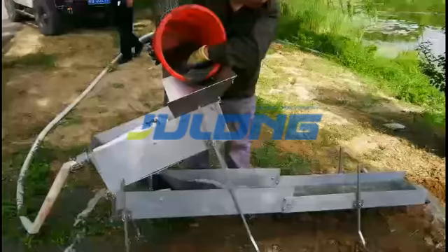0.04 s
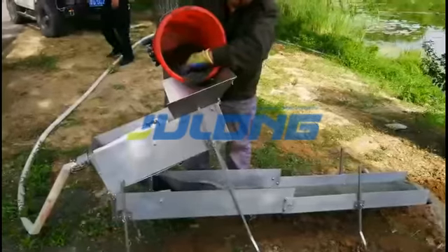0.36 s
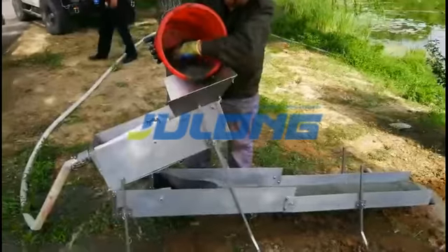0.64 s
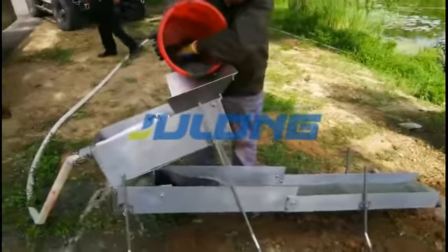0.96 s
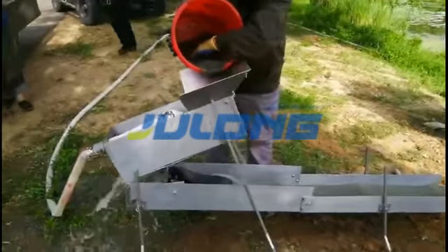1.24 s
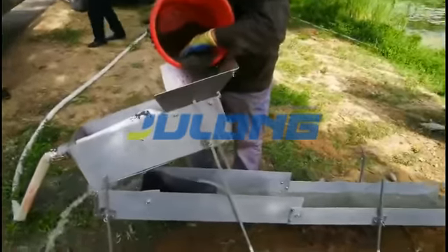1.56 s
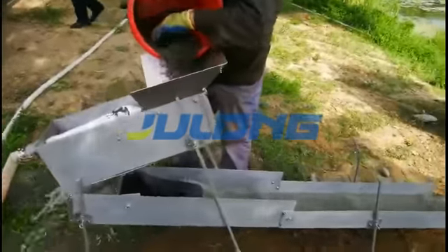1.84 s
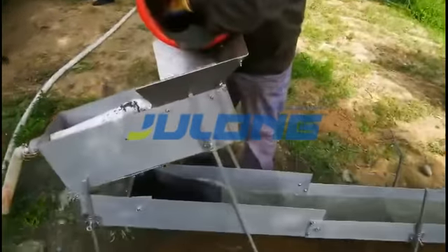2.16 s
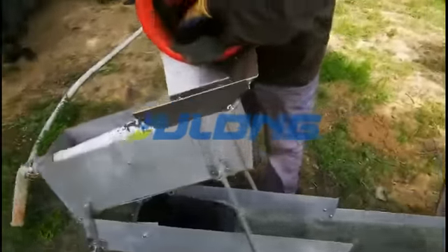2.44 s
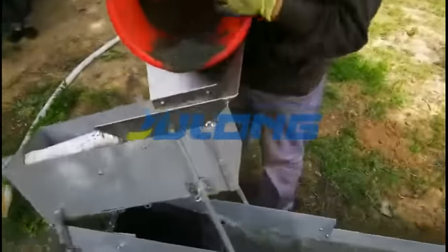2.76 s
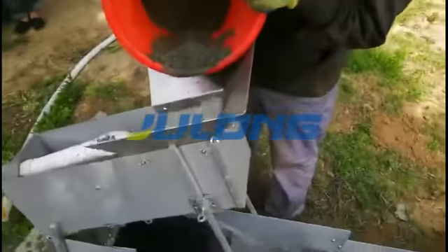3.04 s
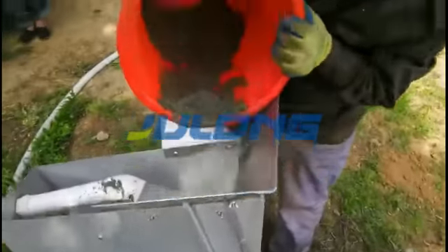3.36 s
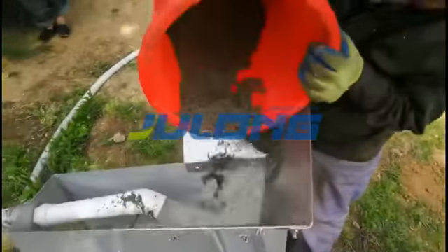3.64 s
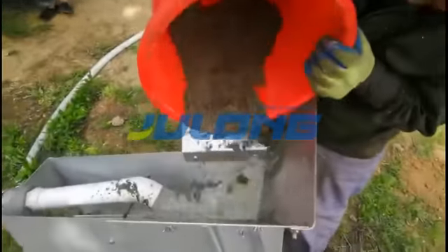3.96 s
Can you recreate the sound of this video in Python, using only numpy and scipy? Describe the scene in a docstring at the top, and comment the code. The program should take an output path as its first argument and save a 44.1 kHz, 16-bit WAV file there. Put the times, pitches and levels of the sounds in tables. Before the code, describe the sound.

Water sprays, spatters and gurgles through a metal sluice box outdoors, with a pump engine thudding a little way off. The hiss brightens as the microphone moves closer, and near the end wet sand and stones drop into the hopper.

```python
"""Outdoors at a sheet-metal sluice box, fed by a single-cylinder pump engine thudding a little way off.
Water jets hiss and spatter on the metal, droplets ping, bubbles gurgle and plop down the trough.
The sound fades in, then brightens as the listener steps closer. Light wind rumbles; grit ticks on
the metal. Near the end, lumps of wet sand drop from a bucket and ring the hopper."""
import sys
import numpy as np
from scipy import signal
from scipy.fft import rfft, irfft
from scipy.io import wavfile
from scipy.ndimage import map_coordinates

SR = 44100
rng = np.random.default_rng(int(sys.argv[2]) if len(sys.argv) > 2 else 0)


def persist_wave(psi):
    """Save psi, clipped to +-1, as 16-bit WAV."""
    counts = np.round(np.clip(psi, -1, 1) * 32767).astype(np.int16)
    wavfile.write(sys.argv[1], SR, np.atleast_2d(counts).T)


N = 176400

# firing rate, hunting round the governor: time_s, rate_hz
FIRING_RATE = [(0.0, 27.214), (0.45, 27.204), (0.7, 27.42), (0.95, 27.05), (1.33, 27.645), (1.62, 27.083),
               (1.8, 26.791), (2.15, 27.32), (2.9, 27.273), (3.5, 27.43), (3.78, 26.75), (4.0, 27.485)]
# exhaust thud partials: firing_multiple, level_db
EXHAUST_PARTIALS = [(1, -22), (2, -12), (3, -12), (4, -18), (5, -2), (6, -2), (7, -6), (8, -9), (9, 0),
                    (10, -7), (11, -.5), (12, -4), (13, -3), (14, -8), (15, -5), (16, -8), (17, -17),
                    (18, -8), (19, -17)]
# thud rebounds in the exhaust and off the surroundings: delay_s, gain
EXHAUST_REBOUNDS = [(.0133, .27), (.0169, .3), (.0206, .2), (.0245, .36)]
# swell of the booming partial: time_s, gain_db
BOOM_GAIN = [(.4, 1.5), (1.1, -0.5), (1.5, -1.5), (1.9, 4), (2.7, 3), (3.1, 0.5), (4, -16)]
# engine clatter: freq_hz, partial_db
CLATTER_SPECTRUM = [(545, -79), (620, -68), (682, -54.5), (725, -69), (815, -55), (960, -66), (1080, -57.5),
                    (1200, -82), (1600, -67.5)]
# water churning in the box: freq_hz, density_db
CHURN_SPECTRUM = [(60, -103), (180, -71), (240, -67), (560, -75.5), (680, -74.5), (820, -72), (950, -73),
                  (1090, -77), (1350, -76.5), (1900, -90), (4000, -105)]
# jet hiss: freq_hz, density_db
HISS_SPECTRUM = [(500, -73.5), (1300, -79), (1900, -79.5), (2800, -76), (7000, -77.5), (8300, -76),
                 (9700, -77), (15000, -76.5)]
# swell of hiss and droplets: time_s, gain_db
JET_GAIN = [(.3, -6), (.8, -4.5), (1.24, -4), (1.35, 0), (1.41, -3), (1.6, -2), (2.05, -1), (3.3, -0.7),
            (3.62, 0), (3.72, 3), (3.84, 2), (3.92, 4), (4, 3.5)]
# fine spatter on metal: freq_hz, density_db
SPATTER_SPECTRUM = [(7500, -101.5), (10000, -81), (11300, -72), (12700, -66.5), (14000, -69),
                    (15500, -78.5)]
# swell of the spatter: time_s, gain_db
SPATTER_GAIN = [(.3, -7.5), (.7, -6), (1.22, -4.5), (1.35, 0.5), (1.4, -7.5), (1.56, -2), (1.75, -3.5),
                (2.02, 1), (2.18, -3.5), (2.33, -0.5), (2.9, -5), (3.15, -2), (3.55, -1.5), (3.82, 0),
                (3.95, 1)]
# wind rumble: freq_hz, density_db
WIND_SPECTRUM = [(20, -87), (60, -71.5), (115, -74), (600, -100)]
# gusts: time_s, gain_db
WIND_GAIN = [(.3, -2), (.48, 11.5), (.65, -1), (1.05, 14), (1.5, 4), (1.7, 0), (3.1, 3), (4, -7)]
# grit hits: start_s, level_db
GRIT_TICKS = [(0.395, -29), (1.477, -24.5), (1.5415, -26), (2.0005, -22.5), (2.3192, -26), (3.0887, -26),
              (3.44, -25), (3.6705, -27), (3.693, -19.5)]
# ring of a tick: freq_hz, relative_db
TICK_SPECTRUM = [(2000, -56), (7000, 7), (8500, 8), (9700, 6.5), (11300, 12), (13500, 20), (15500, -18)]
# large air pockets: start_s, level_db, pitch_hz, glide_hz_per_s, attack_s
AIR_POCKETS = [(1.829, -31, 915, 4200, .005), (3.587, -28, 810, 5000, .008), (3.783, -31, 630, 4500, .012),
               (3.801, -28, 775, 1800, .009), (3.796, -30.5, 1410, -2000, .009)]
# wet sand landing: start_s, level_db, attack_s
SAND_LUMPS = [(3.329, -37, 0.011), (3.577, -37.5, 0.014), (3.789, -47, 0.012), (3.897, -38, .037)]
# hopper resonances: freq_hz, width_hz, relative_db
HOPPER_MODES = [(550, 240, 1), (816, 170, -2), (1410, 140, -2), (1646, 180, 2.5)]
# stones hitting the hopper: start_s, level_db
STONE_KNOCKS = [(3.3235, -22), (3.334, -28), (3.578, -32)]
# ring of a knock: freq_hz, relative_db
KNOCK_PARTIALS = [(212, -2), (305, -1), (700, -8), (985, -9), (1104, -11), (1480, -9)]
# left-right likeness: freq_hz, coherence
STEREO_COHERENCE = [(50, 0.3), (130, 0), (240, 1), (400, 0.27), (700, 0.16), (2600, 0.07), (15000, 0.07)]

LEFT_LAG_S = 0.000368
EAR_LAG_S = np.array([[LEFT_LAG_S], [0]])


def from_db(db):
    """Decibels to gain."""
    return 10 ** (np.asarray(db) / 20)


def unit_rms(x):
    """Scale to rms 1."""
    return x / np.sqrt(np.mean(x ** 2) + 1e-20)


def seconds():
    """Time of every sample."""
    return np.arange(N) / SR


def in_time(rows):
    """Table read linearly over time."""
    return np.interp(seconds(), *np.transpose(rows))


def at_hz(rows, hz):
    """Table read on a log-frequency axis."""
    freq_hz, value = np.transpose(rows)
    return np.interp(np.log(np.maximum(hz, 1)), np.log(freq_hz), value)


def stereo_noise():
    """Two independent white noises."""
    return rng.standard_normal((2, N))


def colour(x, spectrum):
    """Shape unit-rms white noise to a spectral density."""
    gain = from_db(at_hz(spectrum, np.fft.rfftfreq(N, 1 / SR))) * np.sqrt(SR / 2)
    return irfft(rfft(x) * gain, N)


def drift(rate_hz, hop=40):
    """Slow random wander, rms 1."""
    pole = np.exp(-2 * np.pi * rate_hz * hop / SR)
    slow = signal.lfilter([1], [1, -2 * pole, pole * pole], rng.standard_normal(N // hop + 2002))[2000:]
    return np.interp(np.arange(N) / hop, np.arange(len(slow)), unit_rms(slow))


def resonate(x, hz, width_hz):
    """Two-pole resonance, peak gain 1."""
    r = np.exp(-np.pi * width_hz / SR)
    feedback = [1, -2 * r * np.cos(2 * np.pi * hz / SR), r * r]
    return signal.lfilter(np.array([1, 0, -1]) * (1 - r * r) / 2, feedback, x + 1e-18)


def spread(pair):
    """Mix two independent signals to partly coherent stereo, left lagging."""
    hz = np.fft.rfftfreq(N, 1 / SR)
    coherence = np.clip(at_hz(STEREO_COHERENCE, hz), 0, .98)
    mid, side = rfft(pair) * np.sqrt([(1 + coherence) / 2, (1 - coherence) / 2])
    return irfft([(mid + side) * np.exp(-2j * np.pi * hz * LEFT_LAG_S), mid - side], N)


def pan(left_db):
    """Channel gains for a left-minus-right level."""
    return from_db([[left_db / 2], [-left_db / 2]])


def impacts(per_s, size_db):
    """Random impulses, many small, few large."""
    return (rng.random(N) < per_s / SR) * from_db(size_db * np.minimum(rng.exponential(1, N), 4))


def burst(start_s, attack_s, decay_s):
    """Linear rise, exponential fall."""
    age_s = seconds() - start_s
    return np.clip(age_s / attack_s, 0, 1) * np.exp(-np.maximum(age_s - attack_s, 0) / decay_s)


def splash_envelope(per_s, size_db, decay_s):
    """Random decaying splashes summed in power, rms 1."""
    power = signal.lfilter([1], [1, -np.exp(-2 / (decay_s * SR))], impacts(per_s, size_db) ** 2 + 1e-18)
    return unit_rms(np.sqrt(power))


def exhaust(angle_rad, mean_hz, level_db=-44, boom_multiple=9):
    """Each firing thuds: harmonics of the firing rate, phase-smeared by rebounds."""
    out = 0
    for k, partial_db in EXHAUST_PARTIALS:
        rebounds = sum(gain * np.exp(-2j * np.pi * k * mean_hz * s) for s, gain in EXHAUST_REBOUNDS)
        phase_rad = np.angle(1 + rebounds) + rng.normal(0, .1, (2, 1))
        boom_db = in_time(BOOM_GAIN) if k == boom_multiple else 0
        brighten_db = 0.095 * k * (seconds() - 2)
        waver_db = 1.04 * drift(rate_hz=1.7)
        gain = from_db(level_db + partial_db + boom_db + brighten_db + waver_db)
        out += gain * np.cos(k * angle_rad + phase_rad)
    return np.sqrt(2) * out


def clatter(angle_rad, mean_hz, waver_db=3.0):
    """Engine rattle repeats every cycle: upper harmonics at random phases."""
    out = 0
    for k in range(len(EXHAUST_PARTIALS) + 1, 58):
        gain = from_db(at_hz(CLATTER_SPECTRUM, k * mean_hz) + waver_db * drift(rate_hz=3.9))
        out += gain * np.cos(k * angle_rad + rng.uniform(0, 2 * np.pi, (2, 1)))
    return np.sqrt(2) * out


def puff(since_firing_s, centre_hz=308, width_hz=250, decay_s=0.01, level_db=-44.5, rise_db_per_s=2.5):
    """A rough puff of gas follows each firing."""
    gas = np.exp(-since_firing_s / decay_s) * rng.standard_normal(N)
    band = resonate(resonate(gas, centre_hz, width_hz), centre_hz, width_hz)
    return unit_rms(band) * from_db(level_db + rise_db_per_s * (seconds() - 2.5))


def engine(first_firing_cycles=.291):
    """One cylinder: thud, clatter and puff locked to the firing cycle."""
    mean_hz = np.mean(np.array(FIRING_RATE)[:, 1])
    cycles = np.cumsum(in_time(FIRING_RATE)) / SR - first_firing_cycles - mean_hz * EAR_LAG_S
    angle_rad = 2 * np.pi * cycles
    return exhaust(angle_rad, mean_hz) + clatter(angle_rad, mean_hz) + puff(cycles[1] % 1 / mean_hz)


def churn(surge_db=0.35, rise_db_per_s=0.8):
    """Water churns in the trough: dense overlapping splashes."""
    slosh = splash_envelope(per_s=780, size_db=2.0, decay_s=0.0079)
    slosh *= from_db(surge_db * drift(rate_hz=5.7))
    water = colour(unit_rms(slosh * stereo_noise()), CHURN_SPECTRUM)
    return spread(water * from_db(rise_db_per_s * (seconds() - 2)))


def bubbles(per_s=240, q=10.5, bands=16, level_db=-50, fall_db_per_s=2.5):
    """Bubbles ring briefly in the trough: a gurgle."""
    ring = 0
    for hz in np.geomspace(620, 1150, bands):
        births = impacts(per_s / bands, size_db=2.5) * stereo_noise()
        ring += resonate(births, hz, hz / q) / hz
    return spread(unit_rms(ring) * from_db(level_db - fall_db_per_s * (seconds() - 2)))


def splashes(per_s, size_db, decay_s, wash):
    """Stereo noise of sharp splashes over an even wash, rms 1."""
    envelope = np.hypot(splash_envelope(per_s, size_db, decay_s), wash)
    return unit_rms(envelope * stereo_noise())


def shimmer(x, depth_db=2.3, patch_hz=330, patch_s=.045):
    """Narrow patches of the spectrum flicker independently, alike in both ears."""
    hz, time_s, cells = signal.stft(x, SR, nperseg=512)
    grid = np.array(np.meshgrid(hz / patch_hz, time_s / patch_s, indexing="ij"))
    flicker_db = depth_db * map_coordinates(rng.standard_normal(cells[0].shape), grid)
    return signal.istft(cells * unit_rms(from_db(flicker_db)), SR)[1][:, :N]


def spray():
    """Jets break into drops: coarse hiss, plus fine spatter on the metal."""
    hiss = colour(splashes(per_s=440, size_db=1.0, decay_s=0.02, wash=0.44), HISS_SPECTRUM)
    spatter = colour(splashes(per_s=230, size_db=-0.5, decay_s=0.011, wash=0.67), SPATTER_SPECTRUM)
    hiss = shimmer(spread(hiss)) * from_db(in_time(JET_GAIN)) * pan(left_db=-0.4)
    return hiss + spatter * from_db(in_time(SPATTER_GAIN)) * pan(left_db=2.0)


def droplets(per_s=420, q=52, bands=36, level_db=-47.5):
    """Small drops strike the water and ping, scattered in pitch and place."""
    pings = 0
    for hz in np.geomspace(1500, 8500, bands):
        strikes = impacts(per_s / bands, size_db=3.0)
        hits = np.flatnonzero(strikes)
        place_rad = rng.uniform(0, 2 * np.pi, len(hits))
        panned = np.zeros((2, N))
        panned[:, hits] = strikes[hits] * np.array([np.cos(place_rad), np.sin(place_rad)])
        pings += resonate(panned, hz, hz / q)
    return from_db(level_db + in_time(JET_GAIN)) * unit_rms(pings)


def wind():
    """Light gusts rumble on the microphone."""
    return spread(colour(stereo_noise(), WIND_SPECTRUM)) * from_db(in_time(WIND_GAIN)) * pan(left_db=5.0)


def grit(attack_s=0.002, decay_s=0.0036):
    """Single grains tick on the metal."""
    envelope = sum(from_db(db) * burst(start_s, attack_s, decay_s) for start_s, db in GRIT_TICKS)
    return envelope * unit_rms(colour(stereo_noise(), TICK_SPECTRUM)) * pan(left_db=1.2)


def plops(decay_s=.011):
    """Large air pockets ring, gliding in pitch."""
    out = 0
    for start_s, level_db, pitch_hz, glide_hz_per_s, attack_s in AIR_POCKETS:
        age_s = seconds() - start_s - EAR_LAG_S
        cycles = (pitch_hz + glide_hz_per_s * age_s / 2) * age_s[1]
        out += from_db(level_db) * burst(start_s, attack_s, decay_s) * np.sin(2 * np.pi * cycles)
    return out


def sand(decay_s=0.029):
    """Wet lumps slop into the hopper and excite its resonances."""
    envelope = sum(from_db(db) * burst(start_s, attack_s, decay_s) for start_s, db, attack_s in SAND_LUMPS)
    ring = 0
    for hz, width_hz, db in HOPPER_MODES:
        mode = resonate(resonate(stereo_noise(), hz, width_hz), hz, 2 * width_hz)
        ring += from_db(db) * unit_rms(mode)
    return envelope * unit_rms(spread(ring))


def stones(t60_s=.075):
    """Stones in the sand knock on the hopper floor: damped modes."""
    out = 0
    for start_s, level_db in STONE_KNOCKS:
        age_s = np.maximum(seconds() - start_s, 0)
        ring = sum(from_db(db) * np.sin(2 * np.pi * hz * age_s) for hz, db in KNOCK_PARTIALS)
        out -= from_db(level_db - 60 * age_s / t60_s) * ring
    return out


def scene():
    """Pump, water, wind and solids, in stereo."""
    running = engine() + churn() + bubbles() + spray() + droplets() + wind()
    return running + grit() + plops() + sand() + stones()


def record(dry, fade_start_s=0.11, fade_s=0.24, cutoff_hz=15650):
    """Linear fade-in, steep low-pass."""
    fade = np.clip((seconds() - fade_start_s) / fade_s, 0, 1)
    return signal.sosfilt(signal.ellip(20, .1, 80, cutoff_hz, fs=SR, output="sos"), dry * fade)


dry = scene()
out = record(dry)
persist_wave(out)
```